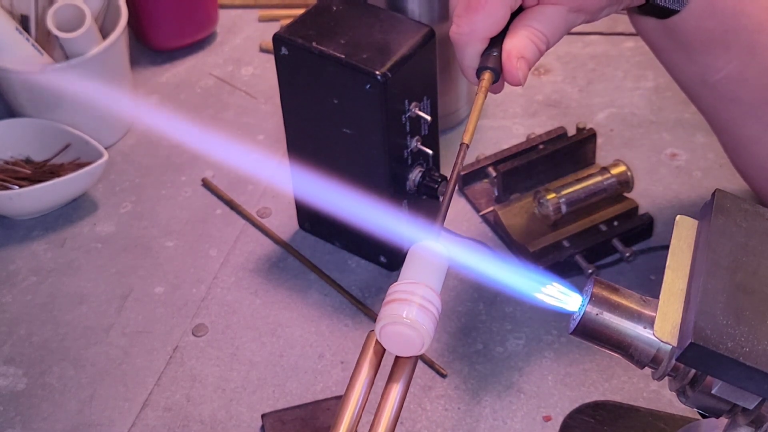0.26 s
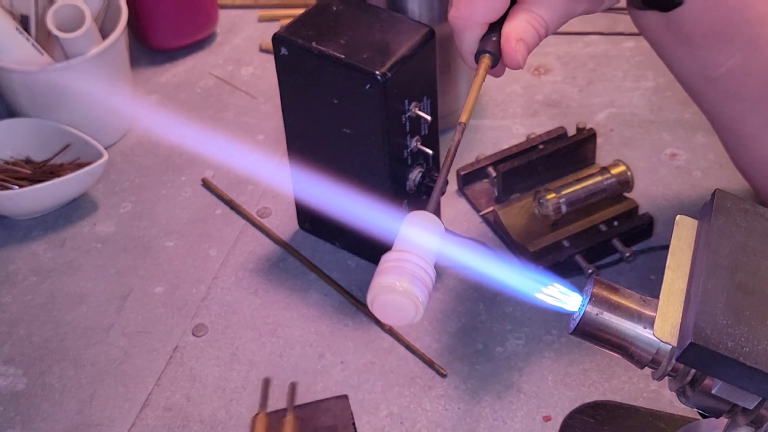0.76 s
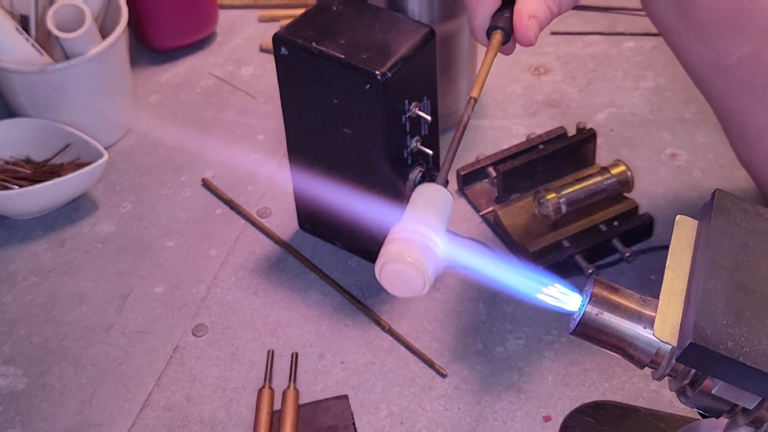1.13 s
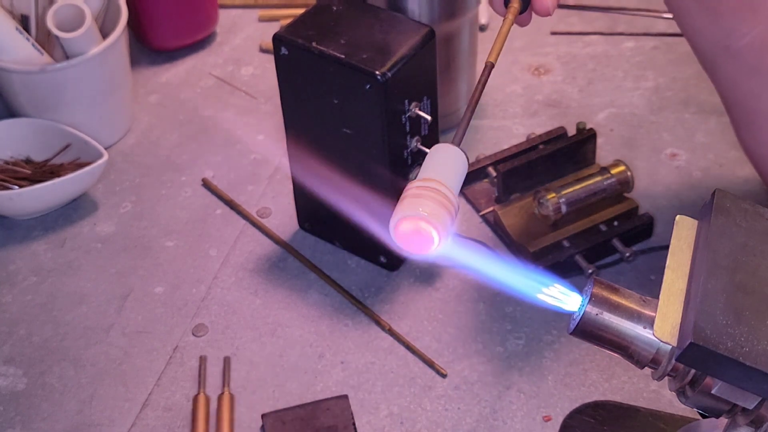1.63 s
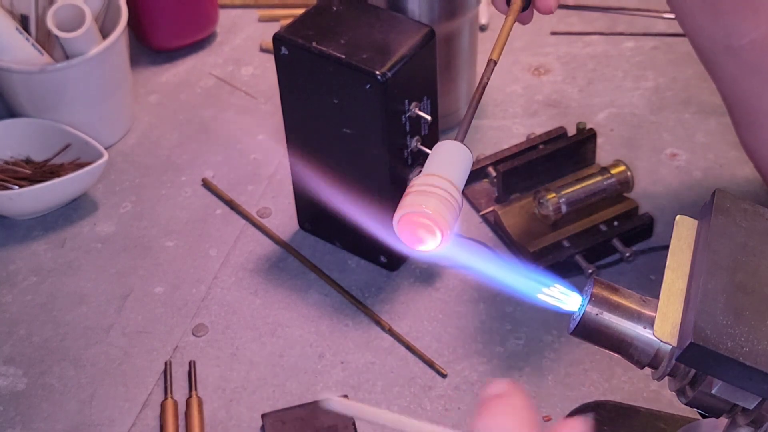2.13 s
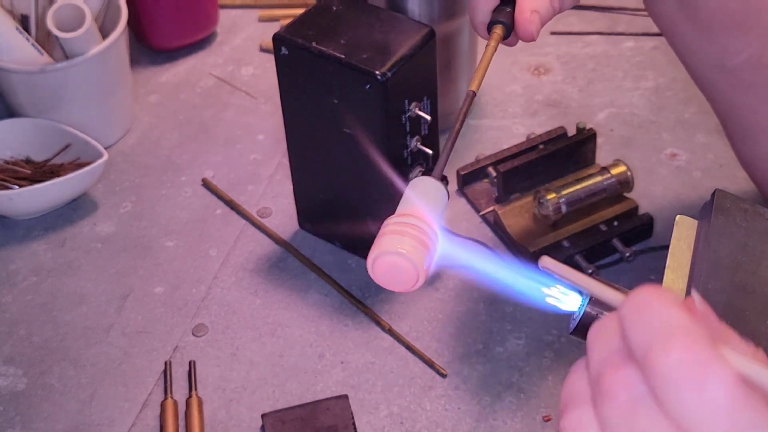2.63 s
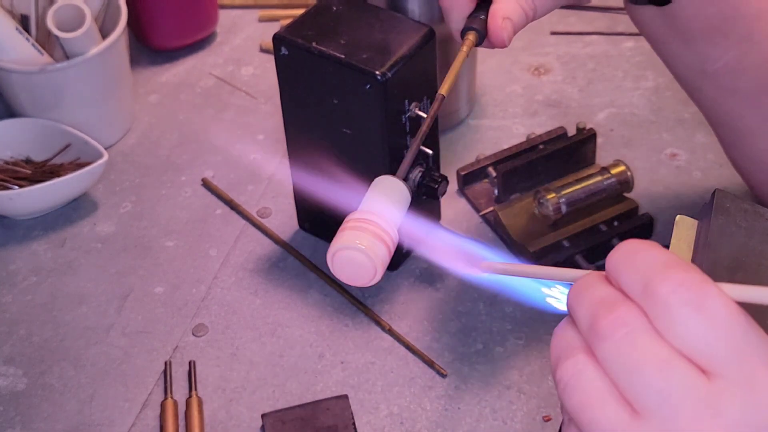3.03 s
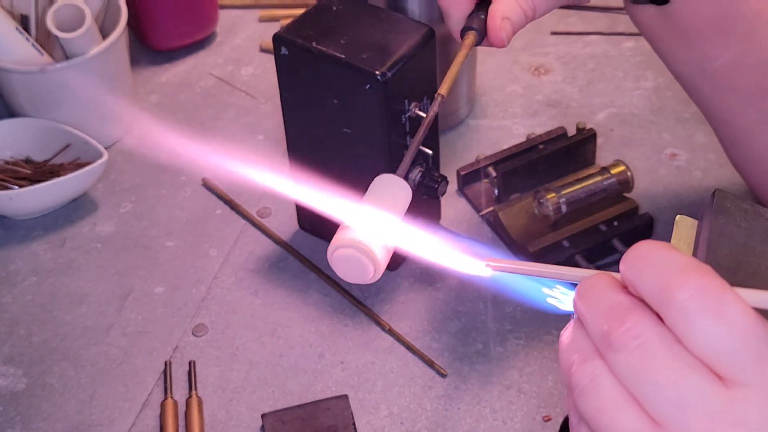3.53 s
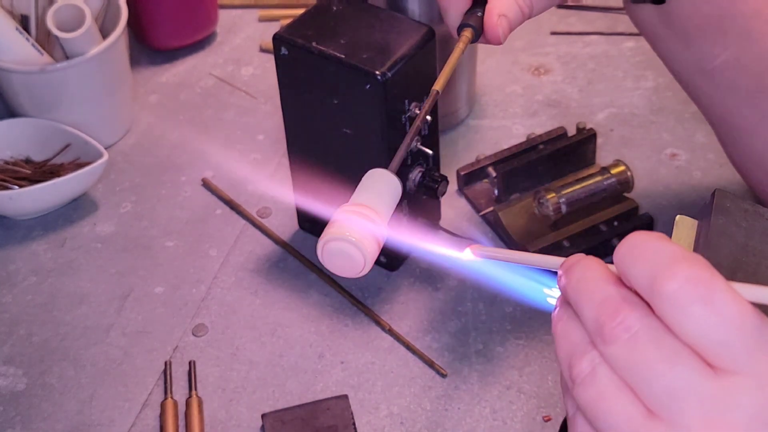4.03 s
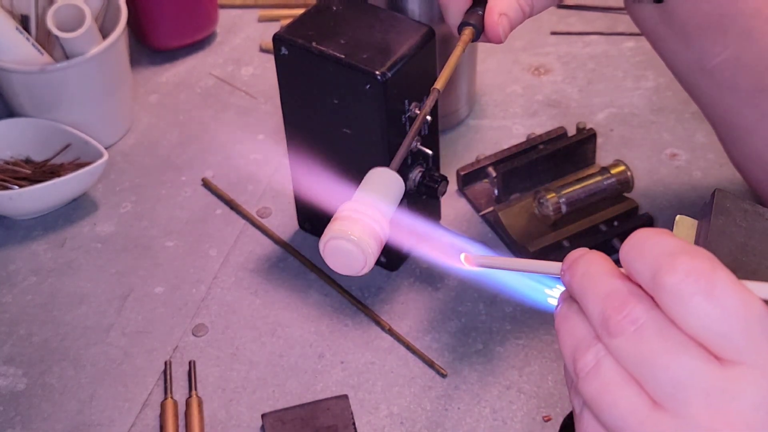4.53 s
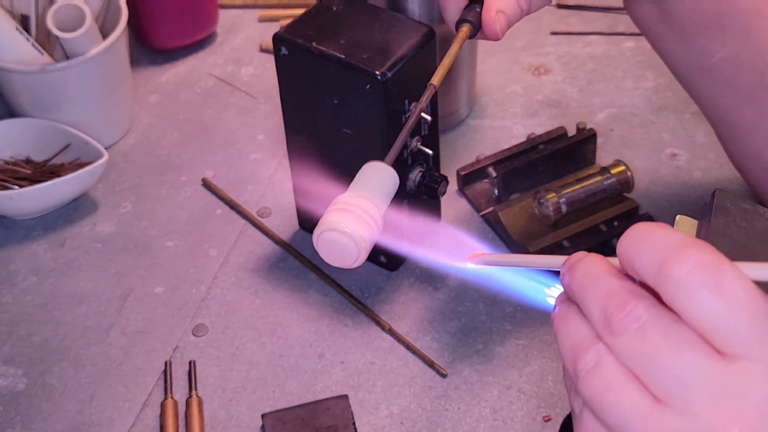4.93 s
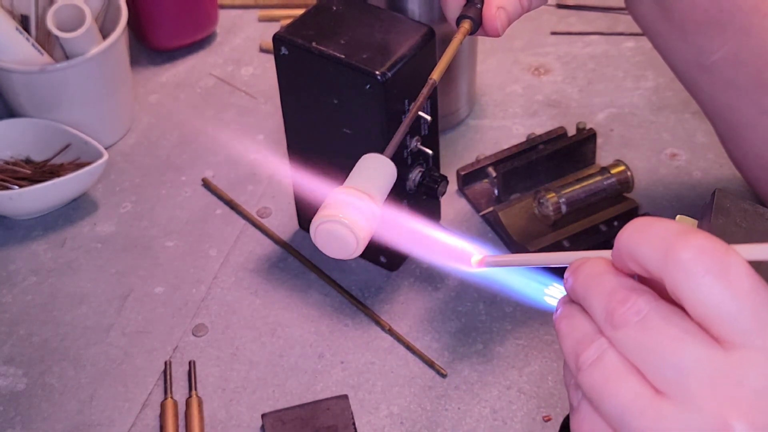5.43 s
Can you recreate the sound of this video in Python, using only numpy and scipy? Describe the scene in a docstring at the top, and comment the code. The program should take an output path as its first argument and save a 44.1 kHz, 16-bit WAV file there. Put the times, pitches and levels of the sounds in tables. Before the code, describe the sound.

A gas torch hisses over the constant low hum and buzz of a small motor, heard close at a workshop bench. Early on, a metal tool is set down, scraping and clattering, its last knock the loudest. Motor and flame carry on, the flame gaining a thin whistle and light sizzle as it meets glass. A short, soft rustle comes late, after which the motor's buzz shifts slightly.

```python
"""In a small workshop, a glass bead turns on a motor-driven rod in the flame of a bench torch.
The motor hums from unbalance and magnetic pull, and a knock on every turn makes it buzz. The flame
rushes, hisses and whistles, more brightly once a glass rod is fed in. A metal hand tool skids onto
the bench and drops, ringing. Drag slowly builds on the motor; with a brief rustle it lets go,
and the motor runs freer."""
import sys
import numpy as np
from scipy import signal
from scipy.fft import rfft, irfft, next_fast_len
from scipy.io import wavfile

SR = 44100
rng = np.random.default_rng(int(sys.argv[2]) if len(sys.argv) > 2 else 0)


def transcribe(signal):
    """Save signal, clipped to [-1, 1], as a 16-bit WAV file at the path in sys.argv[1]."""
    frames = np.atleast_2d(signal).T
    limited = np.clip(frames, -1, 1)
    pcm = np.round(limited * 32767).astype(np.int16)
    wavfile.write(sys.argv[1], SR, pcm)


N = 250782
TIME = np.arange(N) / SR

# The motor's hum. Each row: multiple of the turning rate, level in dB, lean to the left in dB,
# waver in dB, dB gained when running free.
MOTOR_HUM = [(1, -64, 8, 3, 3), (2, -36.5, 3, -0.1, 0.5), (3, -57.5, 27, 1.5, 2), (4, -44.5, 9, 0.5, 1),
             (5, -55.5, 3, 0.8, -4), (6, -56.5, 1, 1.3, 2.5), (7, -55, -1, 1.3, 1.6),
             (8, -80, 11, 1.5, 9.5)]
# The housing's buzz. Each row: multiple of the turning rate, base level in dB, lean to the left in dB,
# dB gained when running free.
HOUSING_BUZZ = [(9, -76, 16, 1), (10, -52, 1.5, -1), (11, -47.5, 1, 0.5), (12, -55, -4, 3),
                (13, -110, 3, 9), (14, -75, 4, 13), (15, -81, 13, 15), (17, -68, 4, 1), (23, -75.5, -4, -1),
                (24, -73.5, 13, 3), (27, -82.5, 8, 17)]
# The hum of the power supply. Each row: pitch in Hz, level in dB.
MAINS_HUM = [(50, -58.5), (120, -62), (240, -77)]

# Noise colours, that is, how strong the lows and highs are. Each row: frequency in Hz, relative dB.
RUSH_COLOUR = [(20, -9), (36, -17), (52, 5.5), (72, 5), (100, 0.5), (140, -8), (195, -2), (222, -14.5),
               (260, -6), (330, -11), (375, -11), (450, -17), (510, -6.5), (620, -18), (780, -18),
               (1100, -34)]  # flame and ventilation
HISS_COLOUR = [(500, 3), (750, -5.5), (930, 6), (1350, 3.5), (1570, 1), (2300, 0.5), (3350, 2), (4100, -2),
               (6500, -3), (8500, -2.5), (11200, -12.5), (12400, -7.5), (14000, -12.5), (15500, -12)]  # gas jet
THUD_COLOUR = [(150, -35), (400, -32), (680, -13), (1150, 2.5), (1500, -9), (1950, -5.5), (2500, -6),
               (3100, -6.5), (4300, -19.5), (9000, -18), (15500, -21)]  # body of the tool's knock
CLICK_COLOUR = [(1500, 4), (3500, 3), (5000, 4.5), (7500, 0), (10000, -2.5), (11200, -6), (12700, 4.5),
                (13500, 1), (15500, -0.5)]  # its sharp edge
BRUSH_COLOUR = [(200, 5.5), (420, 12), (750, 7), (1500, 1), (4000, 1), (5400, 2), (6500, -2), (9500, -1),
                (12000, -3), (15500, -4)]  # rustle

# Resonances, the pitches a thing favours. Each row: centre in Hz, width in Hz, relative level in dB.
TORCH_HEAD_PEAKS = [(925, 20, -75.5), (1180, 13, -77.5), (1416, 34, -72), (1888, 60, -73), (2649, 44, -68),
                    (2900, 30, -74.5), (4290, 82, -76.5), (4840, 160, -70.5), (6040, 150, -71.5),
                    (6550, 140, -72.5), (7500, 58, -83), (10360, 120, -78.5), (12980, 130, -71.5)]
BROAD_WHISTLE_PEAKS = [(2590, 130, -7.5), (2842, 28, -5.5), (3030, 43, -5.5), (3180, 45, -11.5),
                       (3360, 59, -8)]
THIN_WHISTLE_PEAKS = [(5890, 41, -11), (6560, 40, -17)]
HOLLOW_ROAR_PEAKS = [(1030, 24, -6), (1167, 26, -1), (1287, 19, -2), (1414, 22, -2.5)]
RUSTLE_PEAKS = [(2890, 34, -8), (5100, 56, -1), (5230, 58, -3), (7770, 90, -3), (8280, 90, 0),
                (9600, 90, -2)]

# The bead enters the flame; then the glass rod nears, flares, softens, shifts and is pushed deeper.
# Each row: start and end in seconds, then the change in dB of the jet, broad whistle, thin whistle,
# sizzle, high fizz and hollow roar.
FLAME_CHANGES = [(0.95, 6.2, -0.5, 4, 2, 3, 7, 0.5), (1.88, 2.65, 0, -11, 15, 1, 0, 0),
                 (2.55, 4.7, 0, -1, -1, 8.5, -1.5, 0), (3.05, 3.6, 1.1, 0.5, 6, 0.5, 3, 1),
                 (3.35, 6.2, -0.5, 4.5, 5, 0, 1.5, -1.5), (4.2, 6.2, 0.6, 0, 4, 0, 1, 1),
                 (4.3, 4.42, 0, -0.5, -1.5, 0, 6.5, -0.5), (5.33, 5.86, -0.5, 2.5, 11, 0, -2, 6)]

# The tool hits the bench. Each row: time in seconds, then strength in dB of knock, click and thunk.
TOOL_HITS = [(1.027, -68, -48, -66), (1.0958, -39, -61, -51), (1.288, -60, -47.5, -70),
             (1.351, -61, -48, -70), (1.4708, -29, -40, -28.5), (1.4799, -32, -42, -40),
             (1.5461, -29.5, -53, -23.5), (1.555, -35, -50, -39), (1.6643, -19, -31, -22.5),
             (1.673, -30, -33, -45), (1.761, -44, -67, -52)]
# Tones that ring after a hit. Each row: pitch in Hz, relative level in dB, seconds to fade by 60 dB.
TOOL_AND_BENCH_TONES = [(206, -11, 0.2), (285, -17, 0.18), (800, -18, 0.1), (1070, -14, 0.091),
                        (1133, -4, 0.11), (1175, -7, 0.11), (1410, -14, 0.1), (1565, -6.5, 0.12),
                        (1665, -11, 0.13), (1856, -8.5, 0.17), (1990, -10.5, 0.11), (2310, -25, 0.13),
                        (2950, -6.5, 0.061), (4740, -19, 0.15), (10540, -18, 0.1), (13100, -21, 0.042),
                        (14437, -20, 0.27)]
BENCH_THUNK_TONES = [(895, -7.5, 0.014), (1113, -7, 0.022), (1320, -11.5, 0.027), (1617, -18, 0.025)]
# Rubbing strokes. Each row: start in seconds, length in seconds, strength in dB.
TOOL_SKIDS = [(1.036, 0.055, -55), (1.094, 0.015, -51), (1.44, 0.03, -54.5), (1.479, 0.077, -42.5),
              (1.552, 0.033, -42), (1.638, 0.02, -50), (1.674, 0.065, -40.5)]
RUSTLE_SQUEAKS = [(4.708, 0.01, -57), (4.744, 0.008, -52)]

# How alike a noise is in the two ears. Each row: frequency in Hz, likeness (1 same, 0 unrelated).
ROOM_EAR_LIKENESS = [(60, 0.81), (92, 0.77), (140, 0.33), (210, 0.91), (330, 0.94), (500, 0.2),
                     (770, -0.15), (1170, 0.012), (1790, 0.059), (2740, 0.39), (4190, 0.094), (6410, 0.053),
                     (9810, -0.13), (15000, 0.14)]
TOOL_EAR_LIKENESS = [(200, 0.83), (640, 0.58), (1400, 0.32), (3100, 0.044), (7000, 0), (15000, 0)]
# Which ear hears a noise louder. Each row: frequency in Hz, lean to the left in dB.
ROOM_EAR_LEAN = [(60, 5), (92, -4), (140, -19), (210, 11), (330, 7), (500, 3), (770, 0), (1170, 2),
                 (1790, 2), (2740, -2), (4190, 1), (6410, 3.0), (9810, 3.5), (15000, 1.5)]
TOOL_EAR_LEAN = [(200, 2), (700, 2), (1300, 0.5), (2400, -1), (4400, 1), (8000, 3), (15000, 4.5)]


def motor(hum_smear_rad=1.2, buzz_smear_rad=0.285):
    """Unbalance and magnetic pull give the low hum; a knock on every turn gives the buzz."""
    turns_per_s, load_db, free = motor_drag()
    angle = 2 * np.pi * (rng.random() + np.cumsum(turns_per_s) / SR) + 0.015 * drift(2.5)
    out = np.zeros((2, N))
    # Bench and housing carry some pitches faster than others, which smears each knock.
    for multiple, db, lean_db, waver_db, free_db in MOTOR_HUM:
        gain = from_db(db + free * free_db + waver_db * drift(3.7))
        out -= pan(lean_db) * gain * np.sin(multiple * angle + hum_smear_rad * multiple ** 2)
    # These tones peak nearly together, so the buzz pulses once per turn.
    for multiple, db, lean_db, free_db in HOUSING_BUZZ:
        gain = from_db(db + load_db + free * free_db + 0.7 * drift(7.7))
        out += pan(lean_db) * gain * np.cos(multiple * angle + buzz_smear_rad * multiple ** 2)
    for hz, db in MAINS_HUM:
        out += from_db(db) * np.sin(2 * np.pi * hz * TIME)
    return np.sqrt(2) * out


def motor_drag(release_s=4.68, spin_up_s=0.13, growth_db_per_s=0.33, fade_db_per_s=4):
    """Drag slows the motor and feeds the buzz; once it lets go, the motor speeds up and the buzz fades."""
    dragged_s, freed_s = np.minimum(TIME, release_s), since(release_s)
    free = 1 - np.exp(-freed_s / spin_up_s)  # 0 while dragged, 1 when running free
    turns_per_s = (1 - free) * (28.88 - 0.047 * dragged_s) + free * 29.02
    quick_drop_db = 3 * (1 - np.exp(-freed_s / 0.03))
    load_db = -5 + growth_db_per_s * dragged_s - quick_drop_db - fade_db_per_s * freed_s
    return turns_per_s, load_db, free


def torch(flicker_db=1.08, whistle_flicker_db=1.44):
    """The gas jet hisses over a low, steady rush; the flame whistles and roars where it meets glass."""
    jet_db, *voice_dbs = flame_levels()
    ripple = reflections(echo_db=-21)
    jet = from_db(jet_db) * noise(lambda hz: broad(HISS_COLOUR)(hz) * ripple)
    jet += from_db(-62.5) * noise(resonances(TORCH_HEAD_PEAKS))
    whistle = noise(resonances(BROAD_WHISTLE_PEAKS))
    thin = thin_whistle()
    sizzle = noise(resonance(centre_hz=9050, width_hz=310))
    fizz = noise(resonance(centre_hz=12870, width_hz=860))
    roar = noise(resonances(HOLLOW_ROAR_PEAKS))
    for db, voice in zip(voice_dbs, (whistle, thin, sizzle, fizz, roar)):
        jet += from_db(db + whistle_flicker_db * drift(12)) * voice
    rush = from_db(-50.5) * noise(broad(RUSH_COLOUR))
    return rush + jet * from_db(flicker_db * drift(41))


def flame_levels():
    """Each move of the glass makes parts of the flame's sound louder or softer for a while."""
    bare_db = np.array([-56.5, -67.5, -84.5, -78.5, -77, -71.5])  # same order as in FLAME_CHANGES
    changes_db = sum(np.outer(change_db, held(start, end, ease_s=0.056))
                     for start, end, *change_db in FLAME_CHANGES)
    return bare_db[:, None] + changes_db


def thin_whistle(flutter_db=4.0, jump_s=5.635, jump_hz=290):
    """The flame whistles on the edge of the glass; the fluttering main tone jumps higher near the end."""
    hz = 3060 + jump_hz * held(jump_s, np.inf, ease_s=0.015)
    upper = sum(from_db(db) * noise(resonance(centre, width)) for centre, width, db in THIN_WHISTLE_PEAKS)
    return from_db(flutter_db * drift(42)) * wandering_tone(hz, wander_hz=32, rate=90) + upper


def hand_tool(chatter_db=2.0, slips_per_s=250):
    """Knocks and chattering skids make the tool and the bench thud, click and ring."""
    forces = np.zeros((3, N))
    for start, *dbs in TOOL_HITS:
        forces[:, round(start * SR)] = from_db(dbs)
    knock, tick, weight = forces
    slide = strokes(TOOL_SKIDS, attack_s=0.015, fade_s=0.091, sag_db_per_s=78)
    slide *= from_db(chatter_db * drift(170))
    slips = (rng.random(N) < slips_per_s / SR) * rng.choice([-1, 1], N) * slide
    ringing = ring(from_db(-11.5) * knock + from_db(-7.5) * slips, TOOL_AND_BENCH_TONES, spread_rad=0.6)
    thunk = ring(weight, BENCH_THUNK_TONES, spread_rad=0.2)
    thud_gain = np.hypot(from_db(-10) * hit_fade(knock, fade_s=0.031, room_db=-18), from_db(-2.5) * slide)
    click_gain = np.hypot(from_db(-5) * hit_fade(tick, fade_s=0.025, room_db=-3), from_db(-4.5) * slide)
    thud = thud_gain * noise(broad(THUD_COLOUR), TOOL_EAR_LIKENESS, TOOL_EAR_LEAN)
    click = click_gain * noise(broad(CLICK_COLOUR), TOOL_EAR_LIKENESS, TOOL_EAR_LEAN)
    return ringing + thunk + thud + click


def ring(force, tones, spread_rad):
    """A struck thing rings with fading tones; each reaches the two ears slightly out of step."""
    t = np.arange(SR // 2) / SR
    response = np.zeros((2, len(t)))
    for k, (hz, db, fade_s) in enumerate(tones):
        phase = 2 * np.pi * hz * t + rng.normal(0, spread_rad, (2, 1))
        response += (-1) ** k * from_db(db) * dying(fade_s) * np.sin(phase)
    return signal.fftconvolve(force[None], response, axes=1)[:, :N]


def hit_fade(force, fade_s, room_db, room_fade_s=0.3):
    """Loudness after each hit: a short crack, then the room's echo dying away."""
    power = dying(fade_s) ** 2 + (from_db(room_db) * dying(room_fade_s)) ** 2
    return np.sqrt(np.maximum(signal.fftconvolve(force ** 2, power)[:N], 0))


def metal_tick():
    """The tool's first touch adds a hard, tiny tick of metal on metal."""
    force = np.zeros(N)
    force[round(TOOL_HITS[0][0] * SR)] = from_db(-41)
    gain = signal.fftconvolve(force, dying(fade_s=0.032))[:N]
    return gain * noise(resonance(centre_hz=6300, width_hz=1900), TOOL_EAR_LIKENESS, TOOL_EAR_LEAN)


def rustle(start_s=4.72, length_s=0.019, rub_db=-49.5):
    """Something brushes the bench, ringing thinly and squeaking faintly; the bench booms softly."""
    brush_gain = strokes([(start_s, length_s, rub_db)], attack_s=0.032, fade_s=0.3)
    squeak_gain = strokes(RUSTLE_SQUEAKS, attack_s=0.006, fade_s=0.057)
    rubbing = noise(broad(BRUSH_COLOUR))
    boom = from_db(-8) * noise(resonance(centre_hz=410, width_hz=50))
    ringing = from_db(-7.5) * noise(resonances(RUSTLE_PEAKS))
    squeak = wandering_tone(hz=2180, wander_hz=24, rate=100)
    return brush_gain * (rubbing + boom + ringing) + squeak_gain * squeak


def strokes(rows, attack_s, fade_s, sag_db_per_s=0):
    """Loudness of rubbing: each stroke swells, holds or sags, then dies away."""
    gains = []
    for start, length, db in rows:
        swell = np.exp(np.minimum(TIME - start, 0) / attack_s)
        fade_db = 60 * since(start + length) / fade_s
        gains.append(swell * from_db(db - sag_db_per_s * since(start) - fade_db))
    return np.max(gains, axis=0)


def reflections(echo_db, count=14):
    """Nearby surfaces send back a few echoes, which ripple the colour of a steady sound."""
    echoes = np.zeros(next_fast_len(N, True))
    signs = rng.choice([-1, 1], count)
    delays_s = rng.uniform(.001, .022, count)
    echoes[(delays_s * SR).astype(int)] = from_db(echo_db) * signs
    echoes[0] = 1  # the direct sound
    return np.abs(rfft(echoes))


def noise(colour, likeness=ROOM_EAR_LIKENESS, lean=ROOM_EAR_LEAN):
    """Stereo noise of standard strength; colour gives the gain at each frequency."""
    size = next_fast_len(N, True)
    hz = np.fft.rfftfreq(size, 1 / SR)
    shared, opposed = rng.standard_normal((2, len(hz))) + 1j * rng.standard_normal((2, len(hz)))
    alike = np.clip(at_hz(likeness, hz), -1, 1)
    ears = np.sqrt(1 + alike) * shared + np.sqrt(1 - alike) * opposed * np.array([[1], [-1]])
    out = irfft(ears * colour(hz) * pan(at_hz(lean, hz)), size)[:, :N]
    return out / np.sqrt(np.mean(out.mean(axis=0) ** 2))


def broad(table):
    """A broad noise colour drawn through a table's points."""
    return lambda hz: from_db(at_hz(table, hz))


def resonance(centre_hz, width_hz):
    """A noise colour with one peak."""
    return lambda hz: 1 / (1 + ((hz - centre_hz) / width_hz) ** 2)


def resonances(peaks):
    """A noise colour with several peaks, whose powers add up."""
    return lambda hz: np.sqrt(sum((from_db(db) * resonance(centre, width)(hz)) ** 2 / width
                                  for centre, width, db in peaks))


def wandering_tone(hz, wander_hz, rate):
    """A single tone whose pitch wanders at random."""
    return np.sqrt(2) * np.sin(2 * np.pi * np.cumsum(hz + wander_hz * drift(rate)) / SR)


def drift(rate, size=8192):
    """A random wobble of typical size 1, changing up to about rate times a second."""
    hz = np.arange(size // 2 + 1) * SR / N
    slow = irfft(rfft(rng.standard_normal(size)) * np.exp(-(hz / rate) ** 2))
    slow /= np.sqrt(np.mean(slow ** 2) + 1e-20)
    return np.interp(np.arange(N) * size / N, np.arange(size), slow)


def dying(fade_s):
    """A half-second fade that falls 60 dB every fade_s seconds."""
    return from_db(-60 * np.arange(SR // 2) / SR / fade_s)


def held(start, end, ease_s):
    """Ease from 0 to 1 at the start and back at the end."""
    return .5 * (np.tanh((TIME - start) / ease_s) - np.tanh((TIME - end) / ease_s))


def since(start):
    """Seconds since a moment, zero before it."""
    return np.maximum(TIME - start, 0)


def pan(lean_db):
    """Left and right gains that average 1."""
    gains = from_db(np.array([[.5], [-.5]]) * lean_db)
    return gains / gains.mean(axis=0)


def at_hz(table, hz):
    """Read between a table's rows, giving each octave equal room."""
    known_hz, values = np.transpose(table)
    return np.interp(np.log(hz + 1), np.log(known_hz), values)


def from_db(db):
    """Turn decibels into a gain to multiply by."""
    return 10 ** (np.asarray(db) / 20)


def scene():
    """Motor, torch and the small handling sounds at the bench."""
    return motor() + torch() + hand_tool() + metal_tick() + rustle()


def record(dry):
    """Cut the treble steeply above 15550 Hz."""
    return signal.sosfilt(signal.ellip(12, .1, 80, 15550, fs=SR, output="sos"), dry)


dry = scene()
out = record(dry)
transcribe(out)
```